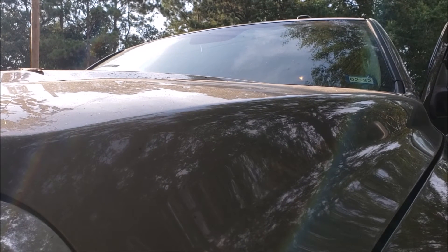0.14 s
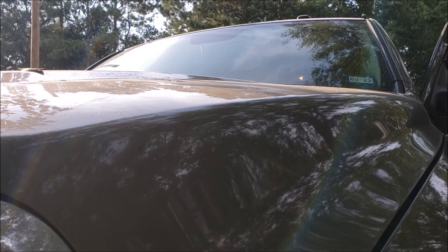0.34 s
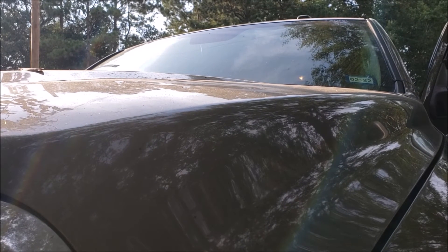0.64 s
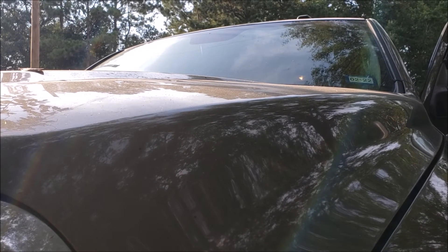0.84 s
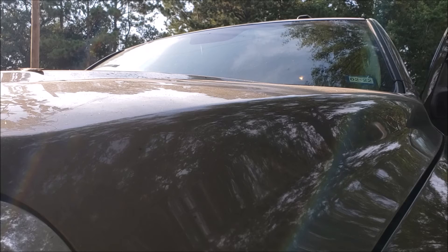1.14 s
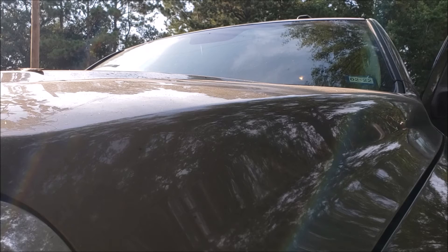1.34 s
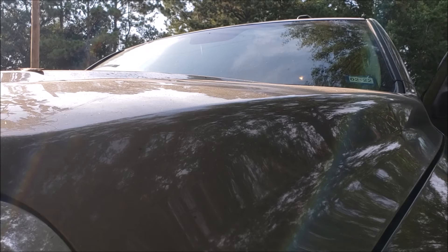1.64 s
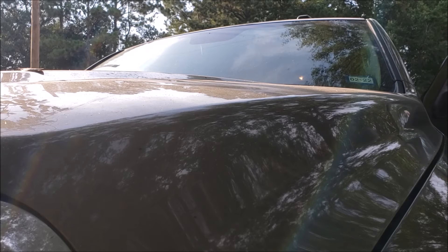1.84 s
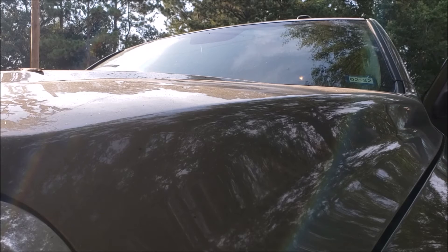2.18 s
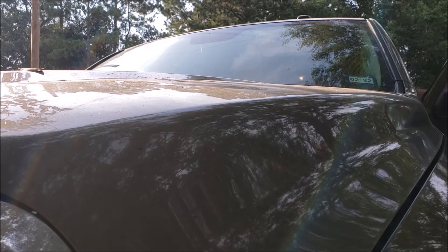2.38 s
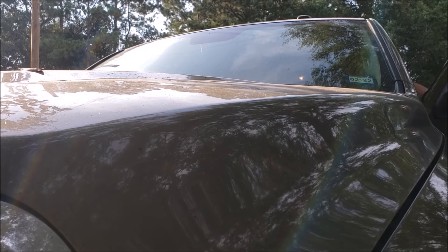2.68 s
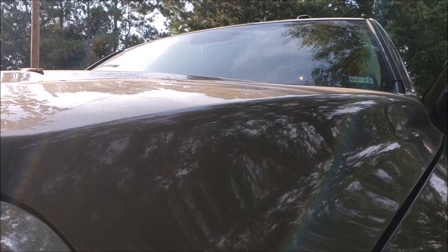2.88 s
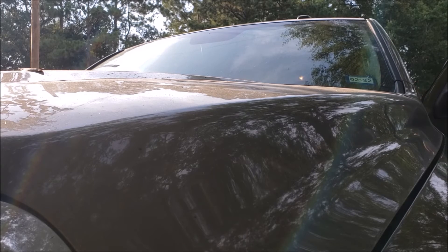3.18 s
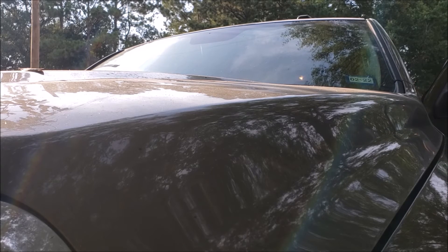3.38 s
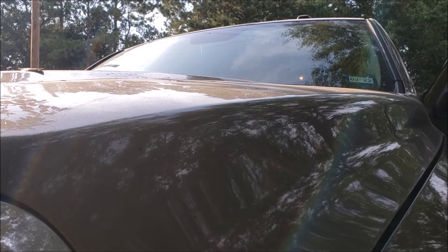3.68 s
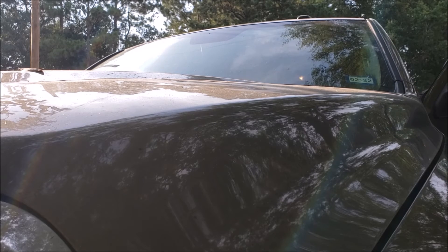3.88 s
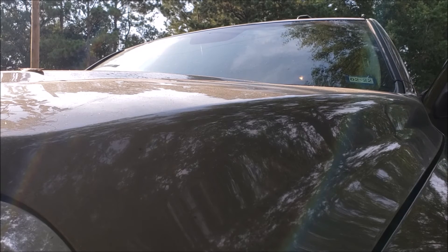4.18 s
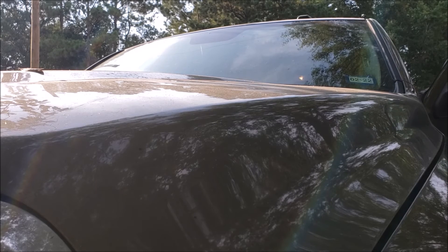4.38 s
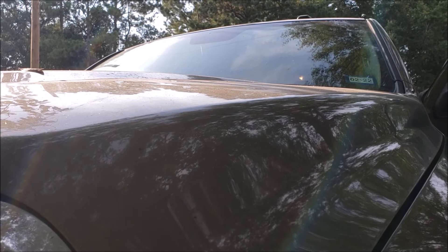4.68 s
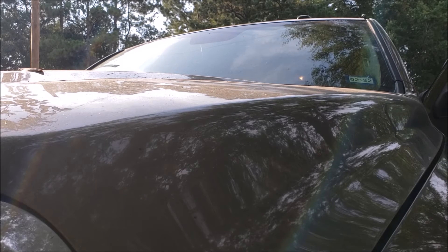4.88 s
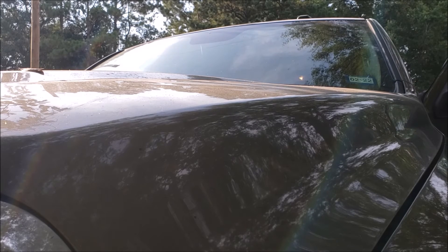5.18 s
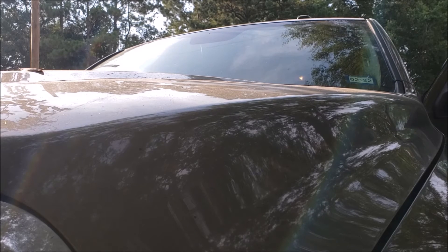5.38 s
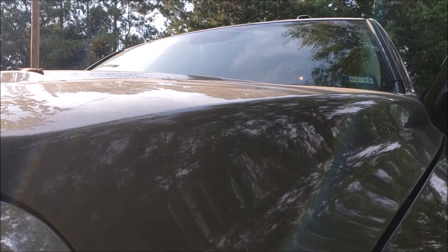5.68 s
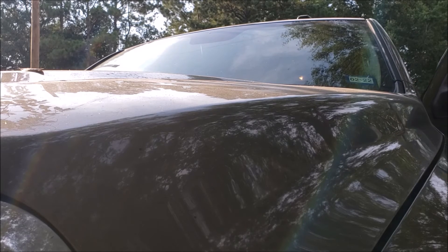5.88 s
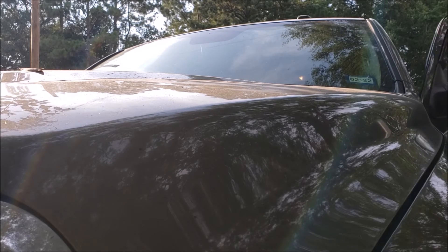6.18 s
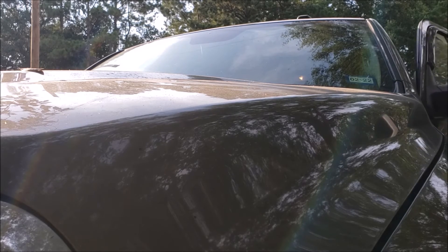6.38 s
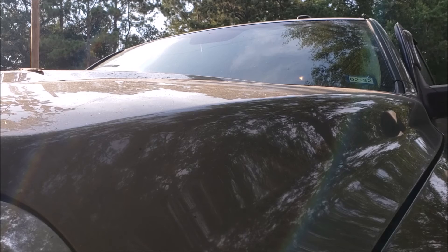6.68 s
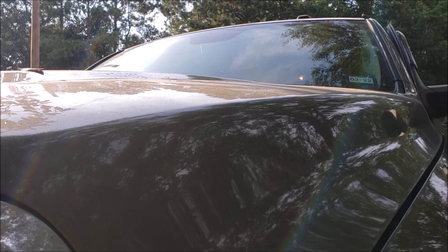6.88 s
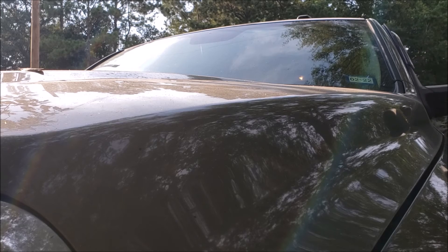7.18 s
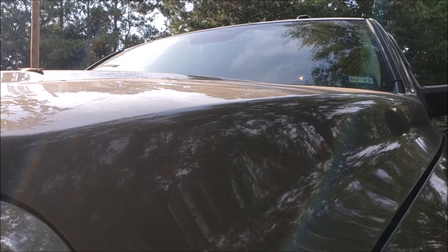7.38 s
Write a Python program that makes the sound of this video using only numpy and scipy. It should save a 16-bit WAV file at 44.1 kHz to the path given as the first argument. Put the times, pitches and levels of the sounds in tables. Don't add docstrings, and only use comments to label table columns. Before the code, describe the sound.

Outdoors among trees, a heavy engine pulls away with pulsing low rumble and clatter while another hums at idle. As it fades, an air horn under a pickup's closed hood gives three same-pitched blasts, each slightly longer, starting with a brief squeal. A close microphone catches faint tree echo, then a soft distant rumble, insects, a far passing car and a door latch click at the end.

```python
import sys
import numpy as np
from scipy import signal
from scipy.fft import rfft, irfft, next_fast_len
from scipy.io import wavfile
from scipy.ndimage import uniform_filter1d, map_coordinates

SR = 44100
rng = np.random.default_rng(int(sys.argv[2]) if len(sys.argv) > 2 else 0)


def transcribe(signal):
    frames = np.atleast_2d(signal).T
    limited = np.clip(frames, -1, 1)
    pcm = np.round(limited * 32767).astype(np.int16)
    wavfile.write(sys.argv[1], SR, pcm)


def undo_db(level):
    steps = np.asarray(level, float) / 20
    return 10 ** steps


N = 332514
t = np.arange(N) / SR


def unit(x):
    return x / np.sqrt(np.mean(x ** 2) + 1e-20)


def ramp(u):
    return np.clip(u, 0, 1)


def along(points, hz):
    f, v = np.transpose(points)
    return np.interp(np.log(hz + 1), np.log(f + 1), v)


def curves(rows):
    at, *cols = np.transpose(rows)
    return [np.interp(t, at, c) for c in cols]


def wobble(rate):
    coarse = t[::64]
    knots = rng.standard_normal(int(N * rate / SR) + 4)
    return np.interp(t, coarse, map_coordinates(knots, [coarse * rate]))


def filtered(x, response):
    m = next_fast_len(N + SR // 2)
    return irfft(rfft(x, m) * response(np.fft.rfftfreq(m, 1 / SR)), m)[..., :N]


def rush(spectrum, alike, patchy_db=0):
    pair = rng.standard_normal((2, N))
    if patchy_db:
        z = signal.stft(pair, nperseg=512)[2]
        field = rng.standard_normal(z.shape[1:])
        field = uniform_filter1d(uniform_filter1d(field, 6, 0), 8, 1)
        pair = signal.istft(z * undo_db(patchy_db * unit(field)), nperseg=512)[1][:, :N]

    def mid_side(hz):
        turn = np.arccos(np.clip(along(alike, hz), -1, 1)) / 2
        return undo_db(along(spectrum, hz)) * [np.cos(turn), np.sin(turn)]

    mid, side = filtered(pair, mid_side)
    return np.array([mid + side, mid - side]) / np.sqrt(np.mean(mid ** 2) + 0.061 * np.mean(side ** 2))


def line(phase, left_db, right_db, lead):
    return np.sqrt(2) * undo_db(np.c_[[left_db, right_db]]) * np.sin(phase + np.c_[[lead / 2, -lead / 2]])


# (valve opens [s], diaphragm locks [s], valve shuts [s], squeal [dB], hum before the lock [dB])
BLASTS = [
    (3.112, 3.149, 3.489, -11.5, -18),
    (3.838, 3.877, 4.31, -20.5, -32.5),
    (4.577, 4.617, 5.163, -21.5, -34.5),
]
COLD_S = [.006, 0, 0]
# (harmonic, left [dB], right [dB], left lead [rad])
TRUMPET = [(1, -10, -12, 0.0), (2, 1, -4, -0.4), (3, -5, -4, 0.3), (4, -8, -9, -1.1), (5, -13, -31, -2.8),
           (6, -8, -16, -2.2), (7, -12, -11, -3.0), (8, -11, -11, -1.7), (9, -37, -48, 1.5),
           (10, -26, -28, -0.8), (11, -15, -29, 2.8), (12, -26, -25, 1.9), (13, -15, -29, 1.4),
           (14, -22, -27, 0.6), (15, -23, -25, 1.4), (16, -35, -29, 2.4), (17, -32, -33, 1.1),
           (18, -38, -39, -3.0), (19, -30, -36, 0.9), (20, -35, -39, -0.5), (21, -27, -42, -0.3),
           (22, -27, -37, -0.7), (23, -29, -40, -1.4), (24, -37, -41, 2.2)]
# (harmonic, left [dB], right [dB], left lead [rad])
BEATS = [(1, -27, -30, 0.2), (2, -34, -39, -1.2), (3, -21, -24, 0.3), (4, -24, -29, -0.7),
         (5, -25, -40, 1.0), (6, -20, -35, -0.5), (7, -24, -21, -3.1), (8, -25, -29, -2.3),
         (9, -31, -31, -2.5), (10, -29, -40, -2.3), (11, -33, -29, 1.2), (12, -27, -30, -2.7),
         (13, -30, -33, -2.1), (14, -33, -27, -0.4), (15, -33, -34, 1.2), (16, -37, -33, -1.0),
         (17, -36, -44, -0.6), (18, -45, -34, 0.6), (19, -40, -37, 1.6), (20, -34, -37, 0.3),
         (21, -28, -36, -0.7), (22, -30, -35, -0.8), (23, -26, -31, -2.8), (24, -44, -34, 0.6)]
# (harmonic, then left [dB], right [dB] of each)
FAINT = [(1, -45, -55, -47, -56, -36, -38), (2, -36, -27, -51, -49, -41, -44),
         (3, -31, -28, -38, -45, -38, -40), (4, -34, -35, -34, -39, -36, -35),
         (5, -30, -38, -30, -33, -29, -42), (6, -28, -46, -41, -38, -22, -29),
         (7, -39, -31, -59, -57, -45, -40), (8, -36, -37, -41, -39, -46, -43),
         (9, -31, -43, -51, -53, -53, -56), (10, -32, -47, -52, -49, -44, -49),
         (11, -59, -42, -71, -48, -55, -49), (12, -33, -38, -35, -38, -36, -49),
         (13, -33, -46, -41, -52, -43, -49), (14, -36, -38, -43, -43, -45, -46),
         (15, -35, -37, -42, -43, -41, -43), (16, -36, -36, -43, -43, -51, -45),
         (17, -48, -43, -44, -49, -56, -46), (18, -47, -43, -41, -43, -45, -47),
         (19, -46, -48, -43, -51, -44, -50), (20, -39, -40, -40, -43, -37, -47),
         (21, -40, -41, -44, -49, -40, -50), (22, -32, -38, -36, -42, -38, -44),
         (23, -40, -40, -44, -48, -45, -46), (24, -47, -41, -49, -42, -51, -45)]
# (frequency [Hz], level [dB])
SQUEAL_LINES = [
    [(1080, -17), (1400, -7), (1720, 0), (2040, -5), (2360, -12), (3760, -22), (4080, -15), (4390, -21)],
    [(1050, -12), (1430, -1), (1730, 0), (2050, -2), (3480, -14), (3770, -21), (4100, -19), (4910, -19)],
    [(1100, -16), (1430, -2), (1730, 0), (2050, -3), (3480, -14), (3780, -22), (4100, -20), (4910, -19)],
]
LAG_HZ, UNSTEADY_RAD = 16, .3
EAGER_DB = 5
FLICKER_DB, RAGGED_DB = 1.62, 3.2
LINGER_DB_PER_S = 80.5
COLD_DB, COLD_WARMS_S, COLD_HUM_DB = -2, .02, 6.5
AIR_LATE_S = 0.018
CLEAN_DB = 10


def horn():
    out, flow, hush = np.zeros((2, N)), np.zeros(N), np.zeros(N)
    order = np.arange(1, len(TRUMPET) + 1)
    starts = 2.63 + .825 * np.minimum(order, 3.4) ** 2 + .075 * order ** 2
    starts = starts + rng.normal(0, .03, len(TRUMPET)) * (order - 1)
    whole_beat = 2 * np.pi * np.cumsum(pitch()) / SR / 5
    late = catching()
    whole_slip = whole_beat - 2 * np.pi * np.cumsum(LAG_HZ * late) / SR + UNSTEADY_RAD * wobble(22)
    flicker = [FLICKER_DB * wobble(28) for _ in TRUMPET]
    for (opens, locks, shuts, squeal_db, hum_db), modes, cold in zip(BLASTS, SQUEAL_LINES, COLD_S):
        span = slice(round((opens - .003) * SR), round((shuts + .14) * SR))
        s, beat, slip = t[span], whole_beat[span], whole_slip[span]
        shut, eager = np.maximum(s - shuts, 0), undo_db(EAGER_DB * late[span])
        low_db, mid_db, high_db = pressure(s, opens, locks + cold, shuts, squeal_db, hum_db)
        if cold > 0:
            warming = np.exp(-np.maximum(s - locks - LOCK_S, 0) / COLD_WARMS_S)
            low_db = low_db + COLD_DB * ramp((s - locks) / LOCK_S) * warming
        locked = ramp((s - locks - cold) / 0.036 + .5)
        edge = ramp(np.minimum(s - opens + 0.0029, s[-1] - s) / 0.0062)
        bright = edge * undo_db(low_db + high_db + 8.5)
        brass = locked * bright * np.minimum(undo_db(high_db + 11), 1)
        for (k, *main), (_, *side), start, (_, *extra), shake in zip(TRUMPET, BEATS, starts, FAINT, flicker):
            if k <= 2:
                gain = edge * undo_db(low_db)
            elif k <= 4:
                gain = edge * undo_db(low_db + mid_db + 2.5)
            else:
                gain = locked * bright if k <= 7 else brass
                gain = gain * undo_db(shake[span] + RAGGED_DB * rng.normal() * ramp(shut / .03))
            if k == 1:
                gain = gain * undo_db(LINGER_DB_PER_S * shut + (cold > 0) * COLD_HUM_DB * (1 - locked))
            phase = 5 * k * beat + start
            beat_phase = phase + slip - np.pi / 2 - side[2] / 2 + main[2] / 2
            tones = line(phase, *main) + locked * eager * line(beat_phase, *side)
            for m, left_db, right_db in zip((2, 3, 4), extra[::2], extra[1::2]):
                tones += locked * eager * line(phase + m * slip - np.pi / 2, left_db, right_db, main[2])
            out[:, span] += gain * tones
        flow[span] = bright * ramp((s - opens) / AIR_LATE_S) ** 2
        hush[span] = CLEAN_DB * locked * (1 - ramp(shut / .014))
        out[:, span] += undo_db(squeal_db) * squeal(s, opens, locks, modes, .22 * wobble(250)[span])
    jet = air(whole_slip, whole_beat, flow, hush)
    return -out * undo_db(0.65 * wobble(90)) + undo_db(2.5) * jet * undo_db([[.6], [-.6]])


def squeal(s, opens, locks, modes, rough):
    out = 0
    for f, db in modes:
        rise = ramp((s - opens - .002 * f / 1000) / .014) ** 1.3
        swell = rise * ramp((locks - s) / .012 + .6) * undo_db(2 * np.sin(150 * s + f))
        out = out + swell * line(2 * np.pi * f * s + rough * f / 1700, db + 1.5, db - 10, -2.2 * f / 1700)
    return out


HOLD_DB, MIDDLE_DB, HIGH_DB = -17.5, -2.5, -8
OPEN_S, LOCK_S = 0.019, 0.014
BOUNCE_S, BOUNCE_DIES_S, BRIGHT_BOUNCE_DB = .03, 0.075, 3.5
LEAK_MIDDLE_DB, LEAK_AIR_DB = -10.5, -9
FADE_DB, FADE_S = 45.5, 0.12
DULL_MIDDLE_DB, DULL_MIDDLE_S, DULL_HIGH_DB, DULL_HIGH_S = 12.5, 0.051, 8, 0.012
DULLER_DB_PER_S = 30.5
LAST_AIR_S, LAST_AIR_DB = .058, 3.5
SURPRISE_DB, SETTLE_S = 6, 0.13


def pressure(s, opens, locks, shuts, squeal_db, hum_db):
    caught = ramp((s - locks) / LOCK_S + .5)
    since, shut = np.maximum(s - locks - LOCK_S / 2, 0), np.maximum(s - shuts, 0)
    bounce = np.cos(2 * np.pi * since / BOUNCE_S) * np.exp(-since / BOUNCE_DIES_S)
    held_db = HOLD_DB + SURPRISE_DB * np.exp(-(s - BLASTS[0][1]) / SETTLE_S)
    low_db = hum_db + (held_db - hum_db) * caught
    low_db = low_db - 18 * (1 - ramp((s - opens) / OPEN_S)) - FADE_DB * (shut / FADE_S) ** 2
    mid_db = LEAK_MIDDLE_DB + (MIDDLE_DB - LEAK_MIDDLE_DB) * caught
    mid_db = mid_db - DULL_MIDDLE_DB * ramp(shut / DULL_MIDDLE_S) ** 2
    leak_db = squeal_db + LEAK_AIR_DB - hum_db
    high_db = leak_db + (HIGH_DB + BRIGHT_BOUNCE_DB * bounce - leak_db) * caught
    high_db = high_db - DULL_HIGH_DB * ramp(shut / DULL_HIGH_S) - DULLER_DB_PER_S * shut
    return low_db, mid_db, high_db - LAST_AIR_DB * ramp((shut - LAST_AIR_S + .015) / .04)


CATCH_HZ = [316.5, 322, 322]
PITCH_HZ, PULL_IN_S, CLIMB_HZ, CLIMB_S, SHUT_HZ, SHUT_S = 317.4, .016, 1.3, .22, 2.4, .05


def pitch():
    hz = np.full(N, float(CATCH_HZ[0]))
    for (opens, locks, shuts, *_), catch_hz in zip(BLASTS, CATCH_HZ):
        since = np.maximum(t - locks, 0)
        blast = PITCH_HZ + (catch_hz - PITCH_HZ) * np.exp(-since / PULL_IN_S)
        blast = blast + CLIMB_HZ * (1 - np.exp(-since / CLIMB_S))
        hz = np.where(t > opens, blast + SHUT_HZ * ramp((t - shuts) / SHUT_S), hz)
    return hz


def catching():
    return sum((t > opens) * np.exp(-np.maximum(t - locks, 0) / .045) for opens, locks, *_ in BLASTS)


# (frequency [Hz], density [dB per Hz])
AIR = [(150, -99), (400, -20), (1000, -5), (2200, 2.5), (3000, -9), (4500, -9), (6000, -16), (7300, -9.5),
       (8000, -23), (8700, -22.5), (10000, -25), (11000, -19), (13500, -24.5), (15000, -21.5), (16000, -25)]
BUZZ_DB, BUZZ_FROM_HZ = -1.5, 7750


def air(beat, fifth, level, hush):
    turn = beat / (2 * np.pi) % 1
    cycle = fifth * 5 / (2 * np.pi) % 1
    patterns = signal.resample(rng.standard_normal((4, 2, 138)), 138 * 8, axis=2)
    on, buzz = level > 0, np.zeros((2, N))
    shapes = patterns[..., (cycle[on] * patterns.shape[2]).astype(int)]
    buzz[:, on] = unit(sum(undo_db(-1.5 * m) * np.cos(m * beat[on] + m) * shape for m, shape in enumerate(shapes)))
    buzz_gain = (hush / CLEAN_DB) * level * unit((.5 + np.exp(-turn / .4)) * (1.2 + np.exp(-cycle / .3)))
    buzz_gain = undo_db(BUZZ_DB) * buzz_gain * undo_db(2.5 * np.array([wobble(60), wobble(60)]))
    buzz = filtered(buzz_gain * buzz, lambda hz: undo_db(along(AIR, hz)) * (hz > BUZZ_FROM_HZ))
    puffs = level * unit((0.46 + np.exp(-turn / 0.41)) * (0.51 + np.exp(-cycle / 0.36)))
    puffs = puffs * undo_db(-hush) * rng.standard_normal((2, N))
    return buzz + filtered(puffs, lambda hz: undo_db(along(AIR, hz)))


# (frequency [Hz], density [dB per Hz])
VALVE = [(60, -40.5), (150, -1.5), (400, -10.5), (900, -7), (3000, -21.5), (8000, -41.5)]


def valve():
    pops = np.zeros(N)
    for opens, _, _, squeal_db, _ in BLASTS:
        decay = undo_db(squeal_db - 13.0 - 60 * abs(t - opens) / 0.15)
        pops += (t > opens) * decay * ramp((t - opens) / 0.0037)
    return pops * rush(VALVE, [(300, .9)])


# (time [s], frequency [Hz])
SPEED = [(0, 26.3), (.12, 26), (.3, 21), (.45, 20.1), (.6, 21.3), (.8, 20.2), (1.05, 20.6), (1.27, 21.5),
         (1.64, 22.4), (2.1, 22.3), (2.8, 22.3), (3.1, 23), (3.6, 25), (3.72, 24.5), (3.9, 20.6),
         (4.5, 20.3), (7.54, 20)]
# (time [s], exhaust effort [dB], rolling clatter [dB])
DRIVE = [(0, -35.5, -55.5), (.1, -30.5, -50.5), (.45, -37.5, -52.5), (.83, -28.5, -42.5), (1.3, -32.5, -43),
         (2.04, -35.5, -45), (2.6, -39, -51.5), (3.0, -41, -53.5), (3.17, -44.5, -47.5), (3.43, -53.5, -57),
         (3.66, -48.5, -59), (3.9, -49, -59), (4.5, -46.5, -60.5), (5.36, -49.5, -64), (5.95, -59.5, -72.5),
         (6.4, -58, -69.5), (7.3, -62.5, -67), (7.54, -51, -63.5)]
# (order, level against exhaust [dB], change once far [dB])
ORDERS_LOW = [(3, -3.5, -4), (4, 0.5, 3.5), (5, -9.5, -8.5), (6, -11, 1.5), (7, 1, 2.1), (8, 1.5, 0.5),
              (9, -19, -0.2)]
# (order, level against exhaust [dB])
UPPER = [(10, -18.5), (12, -11.5), (13, -13.5), (16, -10), (20, -13), (21, -10.5), (24, -18)]
# (frequency [Hz], gain [dB])
PIPE = [(60, 0), (68, -4.5), (82, -4), (102, 6.5), (140, -6.5), (153, -0.5), (165, -4.5), (185, -9.5)]
# (frequency [Hz], density [dB per Hz])
EXHAUST = [(18, -47.5), (30, -24), (75, -8.5), (125, -14), (236, -8), (454, -14.5), (779, -29.5),
           (1500, -38), (1950, -66.5), (3300, -120)]
# (frequency [Hz], density [dB per Hz])
FAR_EXHAUST = [(18, -42), (30, -14), (135, -11.5), (244, -6), (292, -11), (562, -22.5), (1500, -32),
               (1950, -63.5), (3300, -120)]
# (frequency [Hz], density [dB per Hz])
CLATTER = [(410, -21), (700, 2.5), (779, -9.5), (965, 0), (1180, -8.5), (1610, -5.5), (2440, -6),
           (2720, -4), (3510, -9), (4210, -14.5), (7190, -20), (9000, -34.5), (11700, -58.5), (19800, -120)]
# (frequency [Hz], density [dB per Hz])
FAR_CLATTER = [(410, -35), (700, -5), (1210, -3.5), (1990, -6), (3000, -8.5), (4500, -13.5), (9000, -24.5),
               (19800, -120)]
# (frequency [Hz], density [dB per Hz])
HISS = [(4710, -28), (8000, -6), (8440, 2), (10700, 3.5), (13900, 1.5), (15400, -6.5), (16000, -11.5),
        (16200, -14)]
# (frequency [Hz], left-right likeness [-1 to 1])
ROAR_ALIKE = [(60, 0.34), (180, 0.86), (550, 0.25), (1650, -0.45), (4970, 0.57), (15000, -0.39)]
# (frequency [Hz], left minus right [dB])
ROAR_BALANCE = [(60, 5), (180, 3), (550, 2.5), (1650, 1.5), (4970, 4.5), (15000, 1.5)]
HISS_DB, HISS_LOST_DB = -19.5, 7.5
RUSTLE_S, RUSTLE_RISE_S, RUSTLE_DB = 6.3, .25, -82.5
LIFT_S, LIFT_HALF_S, LIFT_DB, BURBLE_DB = 3.15, 0.23, -11, 3.5


def engine():
    speed_hz, = curves(SPEED)
    cycle = 2 * np.pi * np.cumsum(speed_hz) / SR
    exhaust_db, clatter_db = curves(DRIVE)
    away = ramp((t - 2.2) / 2.8) * np.pi / 2
    near, far = np.cos(away), np.sin(away)
    idling_db = 12 * ramp((.6 - t) / 0.39)
    lift = np.exp(-((t - LIFT_S) / LIFT_HALF_S) ** 4)

    def order_tone(k, db):
        phase = k * cycle + (0.054 * k - .05) * wobble(5.6) + rng.uniform(0, 2 * np.pi)
        return undo_db(exhaust_db + db + 1.6 * wobble(6.8)) * np.sin(phase)

    tones = np.zeros(N)
    for k, db, far_db in ORDERS_LOW:
        lift_db = (LIFT_DB if k <= 5 else BURBLE_DB) * lift
        load_db = (k >= 5) * idling_db
        tones += order_tone(k, db + lift_db + far_db * far + along(PIPE, k * speed_hz) - load_db)
    for k, db in UPPER:
        tones += order_tone(k, db - 9 * ramp((t - 1.4) / 0.57) - 30 * away - idling_db)

    def fading(near_spectrum, far_spectrum, patchy_db):
        return near * rush(near_spectrum, ROAR_ALIKE, patchy_db) + far * rush(far_spectrum, ROAR_ALIKE)

    firing = 1 + 0.68 * np.cos(4 * cycle) + 0.052 * np.cos(cycle)
    exhaust = undo_db(exhaust_db - 1.5) * firing * fading(EXHAUST, FAR_EXHAUST, patchy_db=1.5)
    clatter = undo_db(clatter_db) * (1 + 0.04 * np.cos(4 * cycle))
    clatter = clatter * fading(CLATTER, FAR_CLATTER, patchy_db=1.15)
    rustle = undo_db(-92.5) + undo_db(RUSTLE_DB) * ramp((t - RUSTLE_S) / RUSTLE_RISE_S)
    hiss = np.hypot(undo_db(clatter_db + HISS_DB - HISS_LOST_DB * far), rustle) * rush(HISS, ROAR_ALIKE)
    pan = lambda f: undo_db(along(ROAR_BALANCE, f) * np.c_[[.5, -.5]])
    return filtered(np.sqrt(2) * tones + exhaust + clatter + hiss, pan)


# (time [s], level [dB], half length [s])
SPITS = [
    (0.176, -68.5, .06),
    (2.193, -61.5, .025),
    (2.75, -61, .04),
]
PUFF_S, PUFF_DB = .011, -33.5


def spits():
    level = sum(undo_db(db) * np.exp(-((t - s) / half) ** 2) for s, db, half in SPITS)
    for opens, _, _, squeal_db, _ in BLASTS:
        puff = ramp((t - opens + PUFF_S) / PUFF_S) * np.exp(-np.maximum(t - opens, 0) / .012)
        level += undo_db(squeal_db + PUFF_DB) * puff
    return level * rush([(8000, -28.0), (11000, 2.0), (14500, 2.0), (16000, -5.5)], [(10000, .2)])


# (time [s], hum [Hz], hum [dB], rumble [dB])
IDLE = [(0.0, 107.2, -27.5, -70), (0.57, 114.6, -41, -66), (1.47, 109.5, -33.5, -30.5),
        (1.89, 111.8, -28.5, -37.5), (2.86, 111.8, -49, -48), (3.3, 111, -54, -51), (4.1, 111.3, -49, -51),
        (5.8, 111.9, -52.5, -60.5), (6.1, 111.4, -68.5, -68.5), (6.4, 113, -55.5, -66),
        (7.12, 114.4, -54, -63), (7.54, 114.2, -54, -49)]
# (frequency [Hz], level [dB])
IDLE_LINES = [(150.7, -62), (183.0, -77.5), (242.2, -62), (323.0, -74.5)]
# (frequency [Hz], density [dB per Hz])
RUMBLE = [(12, -44.5), (20, -14.5), (97, -2), (140, 6.5), (200, -15), (260, -37), (440, -120)]
LOPE_S, LOPE_HALF_S, LOPE_DB = 6.53, 0.34, -53.5


def idle():
    hz, hum_db, rumble_db = curves(IDLE)
    turns = np.cumsum(hz) / SR
    hum = undo_db(hum_db + 2.2 * wobble(11)) * np.sin(2 * np.pi * turns + .4 * wobble(2.8))
    tones = undo_db(LOPE_DB) * np.exp(-((t - LOPE_S) / LOPE_HALF_S) ** 2) * np.sin(np.pi * turns)
    for f, db in IDLE_LINES:
        tones += undo_db(db + 2.5 * wobble(3)) * np.sin(2 * np.pi * f * t + .6 * wobble(5))
    rumble = undo_db(rumble_db - 1.5) * rush(RUMBLE, [(30, .95)], patchy_db=1.5)
    return (np.sqrt(2) * (hum + tones) + rumble) * undo_db([[1.2], [-1.2]])


# (time [s], knock [dB], crack against the knock [dB])
LATCH = [
    (7.397, -50.5, -30),
    (7.413, -42, -32),
    (7.462, -45, 7),
    (7.469, -29.5, -5.5),
    (7.476, -41, -10),
    (7.488, -47, -8),
    (7.5, -46, -15.5),
]
# (frequency [Hz], width [Hz], level [dB])
DOOR = [(253, 30, 0), (386, 37, 0), (586, 65, -4), (1900, 120, -16.5)]


def latch():
    blows, cracks = np.zeros(N), np.zeros((2, N))
    for s, db, crack_db in LATCH:
        blows[round(s * SR)] = undo_db(db + 36.5)
        cracks += (t > s) * undo_db(db + crack_db - 12.5 - 60 * abs(t - s) / 0.05)

    def panel(f):
        return sum((-1) ** k * undo_db(db) * 1j * f * w / (c * c - f * f + 1j * f * w)
                   for k, (c, w, db) in enumerate(DOOR))

    rattle = rush([(300, -0.5), (3000, -2), (8000, -7.0), (16000, -14.0)], [(300, 0.39)])
    return filtered(blows, panel) + cracks * rattle


# (frequency [Hz], decay by 60 dB [s])
TREES = [(300, .7), (900, .5), (2000, .62), (4500, .6), (8000, .4)]


def trees(x):
    out = np.zeros((2, N + 2 * SR))
    for opens, _, shuts, *_ in BLASTS:
        hz, s, z = signal.stft(rng.standard_normal((2, SR)), SR, nperseg=256)
        tail = signal.istft(z * undo_db(-60 * s / along(TREES, hz)[:, None]), SR, nperseg=256)[1]
        first = round((opens - .02) * SR)
        blast = x[:, first:round((shuts + .15) * SR)]
        echo = signal.fftconvolve(blast, tail / np.linalg.norm(tail[0]), axes=1)
        out[:, first + 1500:][:, :echo.shape[1]] += echo
    return out[:, :N]


# (frequency [Hz], density [dB per Hz])
TYRES = [(500, -32), (1000, -3), (1400, 0), (1800, -8), (2600, -30)]
PASSING_S, PASSING_HALF_S, PASSING_DB = 5.9, .35, -75


def passing():
    swell = np.exp(-((t - PASSING_S) / PASSING_HALF_S) ** 2)
    return undo_db(PASSING_DB) * swell * rush(TYRES, [(1000, 0.44)])


# (time [s], level [dB])
INSECTS = [
    (5.3, -97.5),
    (5.7, -83),
    (6.4, -82.5),
    (7.2, -77.5),
    (7.54, -82.5),
]
# (frequency [Hz], density [dB per Hz])
CRICKETS = [(2100, -31), (2600, -6), (3100, 0), (3350, -6), (3800, -29)]
# (frequency [Hz], density [dB per Hz])
HIGH_BAND = [(8500, -39), (9600, -5), (10300, 1), (11000, -7), (12500, -39)]
CRICKETS_DB = 1


def insects():
    trill_db, = curves(INSECTS)
    flutter = undo_db(trill_db + 4.3 * np.array([wobble(30), wobble(30)]))
    trill = flutter * np.sin(2 * np.pi * 3140 * t + 3 * wobble(70))
    band = undo_db(trill_db + CRICKETS_DB) * rush(CRICKETS, [(3000, .2)])
    high_band_db, = curves([(3, -74), (3.3, -91), (6, -90.5), (6.6, -84.5)])
    return trill + band + undo_db(high_band_db) * rush(HIGH_BAND, [(10000, .2)])


def scene():
    blasts = horn() + valve()
    echo = undo_db(-33.5) * trees(blasts)
    return blasts + echo + engine() + spits() + idle() + insects() + passing() + latch()


def low_pass(x):
    return signal.sosfilt(signal.butter(12, 16610, fs=SR, output="sos"), x)


def record(dry):
    x = filtered(dry, lambda hz: (hz < 15900) * hz ** 2 / (hz ** 2 + 30 ** 2))
    x = x / (1 + abs(x) ** 8) ** (1 / 8)
    return low_pass(x)


dry = scene()
out = record(dry)
transcribe(out)
```